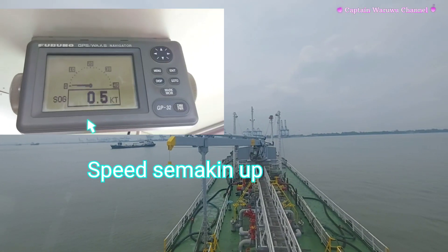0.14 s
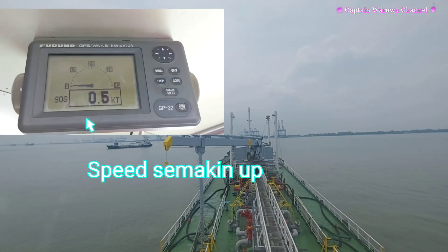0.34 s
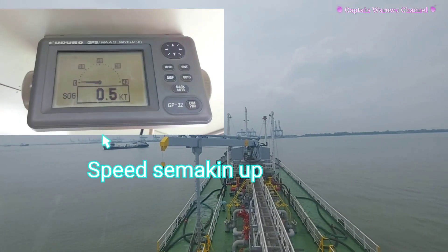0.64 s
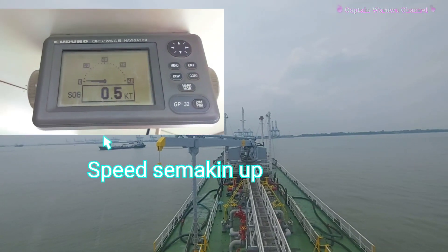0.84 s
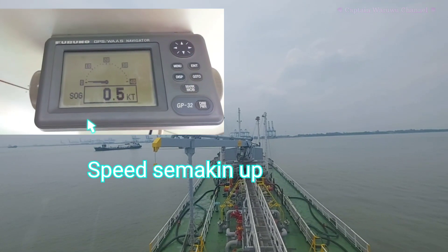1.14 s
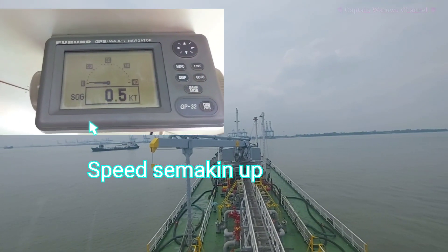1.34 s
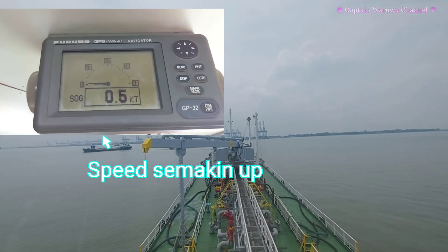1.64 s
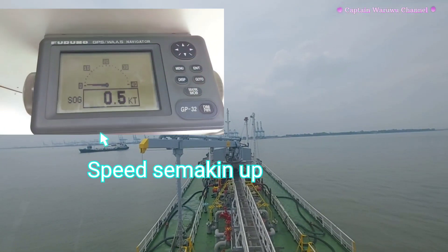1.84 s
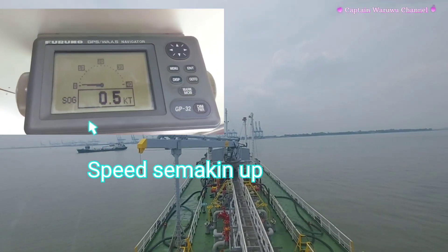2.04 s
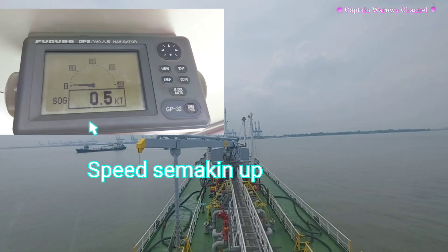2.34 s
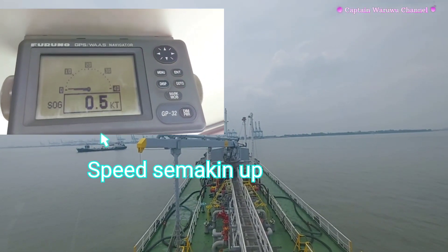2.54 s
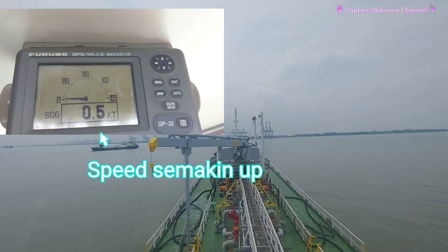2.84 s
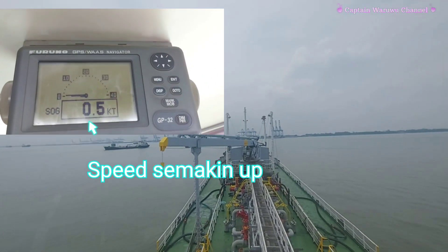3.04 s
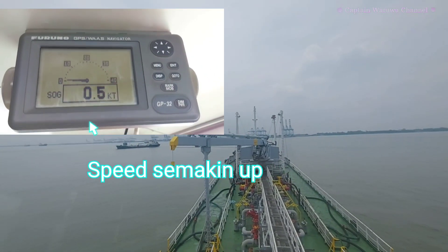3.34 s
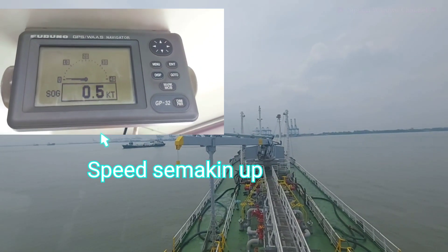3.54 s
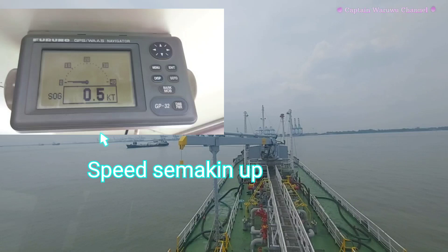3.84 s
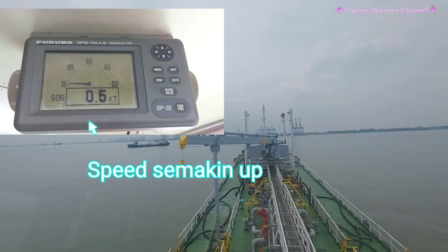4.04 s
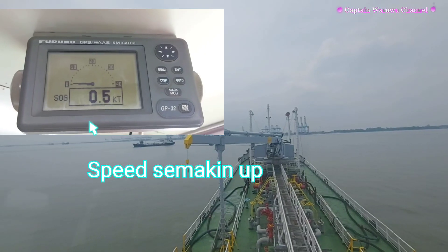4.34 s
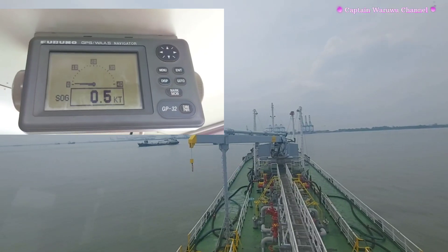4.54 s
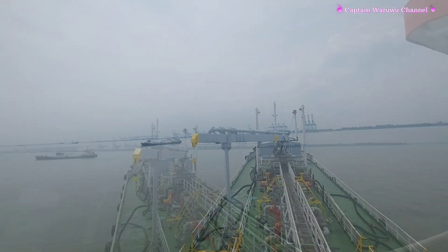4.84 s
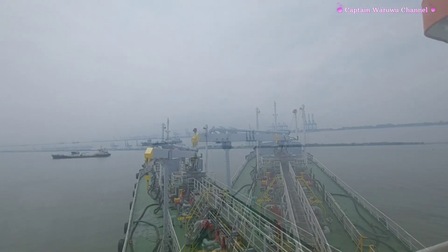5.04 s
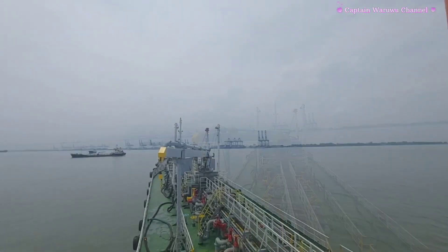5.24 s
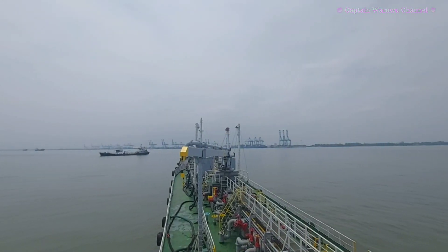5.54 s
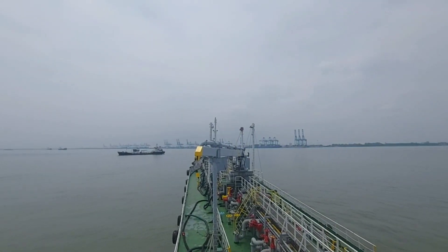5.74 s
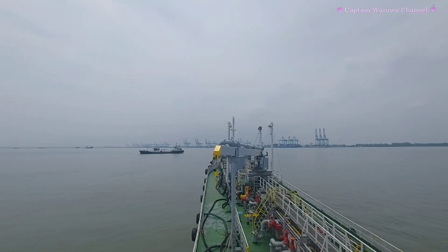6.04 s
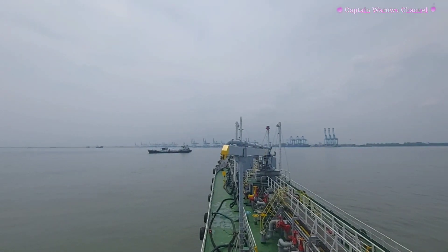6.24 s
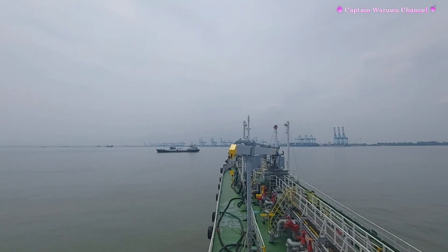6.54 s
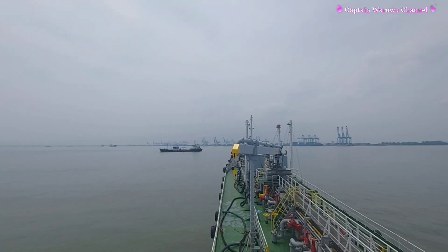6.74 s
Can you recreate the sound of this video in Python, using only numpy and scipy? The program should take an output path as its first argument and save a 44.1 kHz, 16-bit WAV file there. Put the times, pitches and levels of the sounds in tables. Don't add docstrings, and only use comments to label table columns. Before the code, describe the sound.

Steady low engine drone aboard a ship, with motor hum and small handling noises, dips to nothing midway, then swells back louder and deeper.

```python
import sys
import numpy as np
from scipy import signal
from scipy.fft import irfft
from scipy.io import wavfile
from scipy.ndimage import uniform_filter1d

SR = 44100
rng = np.random.default_rng(int(sys.argv[2]) if len(sys.argv) > 2 else 0)


def volts_from_db(level):
    exponent = np.asarray(level, float) / 20
    return 10 ** exponent


def unload_wav(signal):
    wavfile.write(
        sys.argv[1],
        SR,
        np.round(np.clip(np.atleast_2d(signal).T, -1, 1) * 32767).astype(np.int16),
    )


N = 303221
CUT_S = 5.051

# (frequency [Hz], likeness [0-1], left leads [rad], left minus right [dB])
MIC_PAIR = [(60, .94, .1, -.5), (310, .82, .15, .4), (900, .4, .5, .5), (1250, .4, 3, -1),
            (2800, .1, 3, -4), (4500, .15, 0, -5), (8000, .35, 0, -.5), (14000, .3, 0, -1.5)]


def read(points, hz, column=1):
    rows = np.array(points, float)
    return np.interp(np.log(hz + 1), np.log(rows[:, 0] + 1), rows[:, column])


def complex_noise(*shape):
    return (rng.standard_normal(shape) + 1j * rng.standard_normal(shape)) / np.sqrt(2)


def likeness(hz):
    return np.clip(read(MIC_PAIR, hz), 0, 1)


def diffuse_pair(hz):
    left, other = complex_noise(len(hz)), complex_noise(len(hz))
    same = likeness(hz)
    delayed = left * np.exp(-1j * read(MIC_PAIR, hz, column=2))
    right = same * delayed + np.sqrt(1 - same ** 2) * other
    lean = volts_from_db(read(MIC_PAIR, hz, column=3) / 2)
    return np.array([left * lean, right / lean])


def roar_db(hz, spectrum, modes):
    resonances = sum(db / (1 + (2 * (hz - f) / width) ** 2) for f, width, db in modes)
    return read(spectrum, hz) + resonances


def engine(cycle_hz, orders, lag, comb, spectrum, modes):
    order_no = np.arange(1, 501)
    hz = order_no * cycle_hz
    lines = diffuse_pair(hz) * volts_from_db(roar_db(hz, spectrum, modes) + read(comb, hz))

    hull_phase = np.polyval(lag[::-1], order_no)
    phase = np.where(order_no <= 30, hull_phase, rng.uniform(0, 2 * np.pi, len(order_no)))
    skew = (1 - likeness(hz)) * rng.standard_normal(len(order_no))
    side = np.array([.5, -.5])
    for order, db, pan_db in orders:
        i = round(order) - 1
        boost = 2 / (volts_from_db(pan_db / 2) + volts_from_db(-pan_db / 2))
        turn = np.exp(1j * (phase[i] + side * skew[i]))
        lines[:, i] = boost * volts_from_db(db + side * pan_db) * turn

    size = 16384
    cycle = irfft(np.pad(lines, ((0, 0), (1, 0))), size) * size / np.sqrt(2)
    at = np.arange(N) / SR * cycle_hz % 1 * size
    return np.array([np.interp(at, np.arange(size), c, period=size) for c in cycle])


def roar(spectrum, modes):
    swell_db, patchy_db = .5, 1.1
    hz = np.fft.rfftfreq(N, 1 / SR)
    steady = diffuse_pair(hz) * volts_from_db(roar_db(hz, spectrum, modes))
    hz, t, z = signal.stft(irfft(steady, N) * np.sqrt(N * SR / 2), SR, nperseg=1024)
    slow = uniform_filter1d(rng.standard_normal(len(t)), size=12) * np.sqrt(12)
    patches = uniform_filter1d(rng.standard_normal(z.shape[1:]), size=14, axis=0)
    patches = uniform_filter1d(patches, size=8, axis=1)
    treble = np.clip(hz / 3000, 0, 1)[:, None]
    gain_db = swell_db * slow + patchy_db * treble * patches / patches.std()
    return signal.istft(z * volts_from_db(gain_db), nperseg=1024)[1][:, :N]


def motor(tones):
    t, out = np.arange(N) / SR, np.zeros(N)
    block = 256
    for hz, db, width_hz in tones:
        steps = rng.standard_normal(N // block + 2)
        wander = np.cumsum(steps) * np.sqrt(abs(width_hz) * block / SR)
        drift = np.interp(np.arange(N) / block, np.arange(len(wander)), wander)
        out += np.sqrt(2) * volts_from_db(db) * np.cos(2 * np.pi * (hz * t + rng.random()) + drift)
    return out


def low_motor():
    # (frequency [Hz], level [dB])
    low_tones = [(57.72, -57.5), (87.57, -49), (114.96, -53.5), (117.27, -49.3)]
    crest_s = 3.8903
    t = np.arange(N) / SR - crest_s
    return sum(np.sqrt(2) * volts_from_db(db) * np.cos(2 * np.pi * hz * t) for hz, db in low_tones)


def wheelhouse():
    # (multiple of cycle rate, level [dB], left minus right [dB])
    orders = [(5, -44.2, 0.1), (6, -38.8, -3.1), (7, -55.3, 1.3), (8, -49.8, 0.8), (9, -47.7, -0.4),
              (10, -46.5, -0.2), (11, -47.6, 0.6), (12, -40.9, 1.4), (16, -56.4, -1.6), (19, -63.1, 2.3),
              (20, -52.1, -0.4), (24, -62.7, 2.3), (27, -61.6, 3.6)]
    # (multiple of cycle rate, level [dB], left minus right [dB])
    gears = [(44, -63.2, 0.3), (46, -66.2, -0.5), (48, -70.5, 3.1), (51, -62.9, 3.0), (52, -67.0, 7.5),
             (71, -68.2, -0.3), (80, -72.7, -11.9), (81, -68.9, -0.9), (87, -60, 9.2), (95, -67.5, -7.3),
             (98, -67.3, 2.5), (104, -77.6, -19.0), (110, -69.8, 2.1), (111, -74.7, 10.7)]
    # (frequency [Hz], line over roar per Hz [dB])
    comb = [(200, -1.5), (400, -5.5), (800, 12), (1100, -1.5), (1500, -4), (2000, 6), (3000, 2.5),
            (4500, 2.5)]
    # (frequency [Hz], level [dB per Hz])
    spectrum = [(28, -78), (42, -72.5), (90, -65.5), (130, -66.5), (200, -74), (260, -74), (380, -80.5),
                (600, -81), (1050, -85), (1300, -94), (2000, -96.5), (3800, -108), (6500, -117),
                (14000, -121)]
    # (frequency [Hz], width [Hz], lift [dB])
    modes = [(145.4, 12, 4.5), (169.5, 16, 6), (227, 10.7, 9), (293.1, 17.3, 11), (343.7, 7.1, 7.5),
             (450.6, 6.7, 10), (494, 22, 10.5), (660, 20, -3), (785, 78, -1.5), (1115, 35, 8),
             (1395, 31, 10.5), (1980, 600, 6), (244.4, 13.4, -9), (1270, 53, -0.5)]
    # (frequency [Hz], level [dB], width [Hz])
    motor_tones = [(289.9, -59.5, 0.67), (448, -71, 1), (688.6, -66, 0.33), (890, -88, 0.41),
                   (1366, -78, 0.45), (1965, -77, 1)]
    # (frequency [Hz], level [dB], width [Hz])
    whines = [(4021, -92, 3), (8236, -102, 3), (8845, -103, 3), (10454, -101, 3), (12064, -101, 3)]
    # (frequency [Hz], level [dB], width [Hz])
    fans = [(86.3, -57, .3), (118.1, -56, .3), (142.4, -55, 1), (144.2, -56, 1), (171.1, -58, 1),
            (175.3, -58, 1)]
    beat = engine(9.9266, orders + gears, (-.46, 2.808, 1.008), comb, spectrum, modes)
    return beat + roar(spectrum, modes) + motor(motor_tones + whines + fans) + low_motor()


def bridge_wing():
    # (multiple of cycle rate, level [dB], left minus right [dB])
    orders = [(6, -26.5, -0.6), (8, -57, 0), (9, -53.5, 0), (10, -48.9, -0.2), (12, -33.0, 1.9),
              (16, -59.8, -0.6), (17, -55.2, -0.3), (18, -44.1, -2.6), (20, -59.7, 5.2), (24, -52.7, 3.3),
              (30, -49.7, 0.8)]
    # (multiple of cycle rate, level [dB], left minus right [dB])
    gears = [(49, -65.1, -1.2), (51, -66.6, 0.7), (60, -72.1, 1.8), (62, -74.9, 0.6), (74, -72.8, 2.6),
             (80, -71.1, 4.5), (81, -65.7, 4.7), (93, -69.0, 3.1), (95, -71.8, -1.9), (98, -71.2, 8.4),
             (101, -71.8, 4.1), (106, -73.5, -4.4), (124, -75.1, -0.8)]
    # (frequency [Hz], line over roar per Hz [dB])
    comb = [(130, -6), (400, 6.5), (800, 6), (1200, 11.5), (1500, -1), (2000, 8), (3000, 4), (4500, -18)]
    # (frequency [Hz], level [dB per Hz])
    spectrum = [(25, -91), (45, -65.5), (110, -63.5), (140, -69), (250, -78), (330, -73), (400, -81),
                (600, -85), (1000, -86.5), (1500, -91), (2200, -96.5), (3800, -104), (6500, -111),
                (14000, -118)]
    # (frequency [Hz], width [Hz], lift [dB])
    modes = [(213, 22, 4), (289, 10, 4.5), (337, 15, 3), (464, 16, 5.5), (496, 42, 7.5), (770, 60, -1),
             (1900, 600, 3), (219, 7.6, -8), (45, 12, -7), (4280, 560, 0.5)]
    # (frequency [Hz], level [dB], width [Hz])
    motor_tones = [(115.7, -55, .5), (179.4, -59, 0.42), (209, -69, .5), (288.6, -56, 1),
                   (500, -75.5, 0.46), (840, -76, 0.99)]
    beat = engine(9.9255, orders + gears, (-1.5, .4, -.0278), comb, spectrum, modes)
    return beat + roar(spectrum, modes) + motor(motor_tones)


def rub(s, db, length_s, centre_hz, spread_oct, rise_share, t60_s):
    grain_db, grain_s = 1.2, .002
    size = 16384
    t, hz = np.arange(size) / SR - min(s, 0), np.fft.rfftfreq(size, 1 / SR)
    colour = np.exp(-.5 * (np.log2((hz + 1) / centre_hz) / spread_oct) ** 2)
    noise = irfft(diffuse_pair(hz) * colour)
    rise = np.minimum(t / max(rise_share * length_s, 1e-3), 1)
    tail = volts_from_db(-60 * np.maximum(t - length_s, 0) / t60_s)
    grain = uniform_filter1d(rng.standard_normal(size), size=round(grain_s * SR))
    shape = rise * tail * volts_from_db(grain_db * grain / grain.std())
    start = max(round(s * SR), 0)
    return np.pad(volts_from_db(db) * shape * noise / noise.std(), ((0, 0), (start, N)))[:, :N]


def scuffs():
    # (time [s], level [dB], length [s])
    swishes = [(-.01, -72, .03), (1.174, -69.5, 0.056), (1.299, -69, .06), (1.385, -74.5, .06),
               (1.443, -72, .06), (1.551, -73, .08), (1.66, -67, 0.057), (1.77, -70.5, .05),
               (1.877, -67.5, .06), (1.95, -72, .06), (2.435, -72, 0.055), (4.57, -76, .06),
               (6.372, -72, .03)]
    # (time [s], level [dB], length [s], centre [Hz])
    soles = [
        (0.497, -69, 0.037, 8000),
        (2.203, -67, .085, 10500),
        (2.434, -67, .05, 6000),
        (3.568, -54.5, .025, 5200),
    ]
    # (time [s], level [dB], length [s], centre [Hz])
    drags = [
        (1.547, -57, 0.12, 2100),
        (4.469, -61, .14, 2000),
    ]
    # (time [s], level [dB], length [s], centre [Hz])
    squeaks = [
        (.398, -77, .06, 8800),
        (0.502, -70, 0.025, 8300),
        (0.514, -72, 0.026, 6000),
        (4.538, -79, .07, 7400),
    ]
    # (time [s], level [dB], length [s], centre [Hz],
    # spread [octaves], rising share [0-1], t60 [s])
    bump = (-.01, -41, .02, 900, .8, .3, .22)
    # spread [octaves], rising share, t60 [s]; cloth also centre [Hz]
    rows = [(*row, 13300, .5, .45, .3) for row in swishes]
    rows += [(*row, 1.1, .25, .36) for row in soles]
    rows += [(*row, .75, .67, .29) for row in drags]
    rows += [(*row, .12, .15, .25) for row in squeaks]
    return sum(rub(*row) for row in rows + [bump])


def ticks():
    # (time [s], level [dB], lowest frequency [Hz])
    clicks = [
        (.143, -50, 12000),
        (.298, -48, 11500),
        (4.815, -50, 6000),
        (5.905, -53, 9500),
        (6.3878, -51, 6000),
        (6.392, -45, 5000),
        (6.396, -47, 7000),
        (6.3982, -37, 1200),
    ]
    out = np.zeros(N)
    for s, db, low_hz in clicks:
        click = signal.lfilter(*signal.butter(2, low_hz, "high", fs=SR), np.eye(1, 128)[0])
        out[round(s * SR):][:128] -= volts_from_db(db) * click
    return out * volts_from_db([[-3], [3]])


def fade(away_s, length_s):
    shoulder = 13
    u = np.maximum(away_s / length_s, 0)
    return u / (1 + u ** shoulder) ** (1 / shoulder)


def scene():
    t = np.arange(N) / SR
    fade_out, fade_in = fade(CUT_S - t, .37), fade(t - CUT_S, .39)
    handling = (scuffs() + ticks()) * (fade_out + fade_in)
    return wheelhouse() * fade_out + bridge_wing() * fade_in + handling


def band_limit(x):
    return signal.sosfilt(signal.butter(12, 15720, fs=SR, output="sos"), x)


def record(dry):
    # (frequency [Hz], share in wheelhouse [0-1], share on bridge wing [0-1])
    wide_share = [(5600, 1, 1), (6600, .5, .9), (7800, .6, .8), (8600, .15, .3), (9800, .5, .05),
                  (11500, .05, .02), (13500, .15, .6), (15500, .15, .8)]
    mid_side = np.array([dry[0] + dry[1], dry[0] - dry[1]]) / 2
    hz, t, z = signal.stft(mid_side, SR, nperseg=1024)
    band = (np.log(hz + 1) * 9).astype(int)
    spell = np.arange(len(t)) // 4
    luck = rng.random((band.max() + 1, len(t) // 4 + 1))[band][:, spell]
    inside_share = read(wide_share, hz)[:, None]
    wing_share = read(wide_share, hz, column=2)[:, None]
    z[1] *= luck < np.where(t < CUT_S, inside_share, wing_share)
    z *= volts_from_db(-5 * np.clip((hz - 13000) / 2700, 0, 1))[:, None]
    mid, side = signal.istft(z, nperseg=1024)[1][:, :N]
    return band_limit(np.array([mid + side, mid - side]))


dry = scene()
out = record(dry)
unload_wav(out)
```